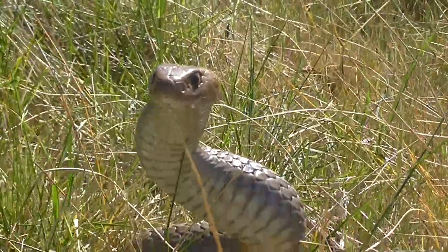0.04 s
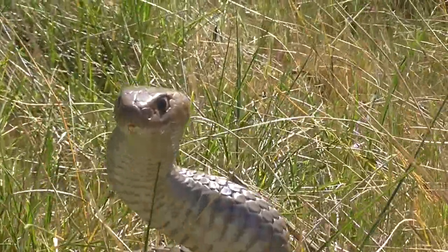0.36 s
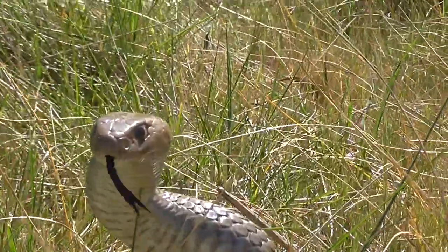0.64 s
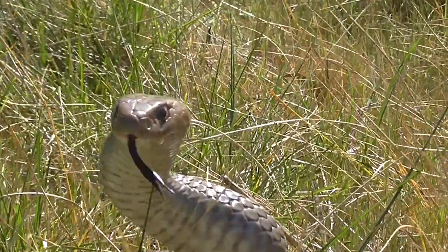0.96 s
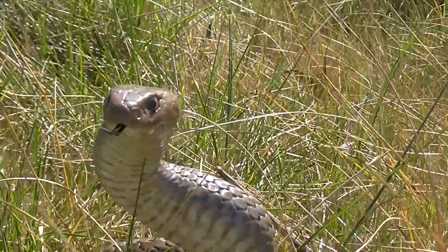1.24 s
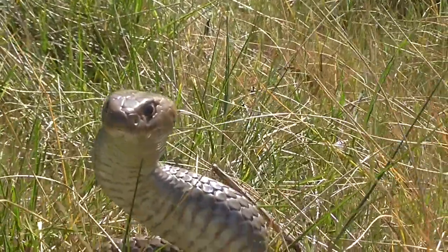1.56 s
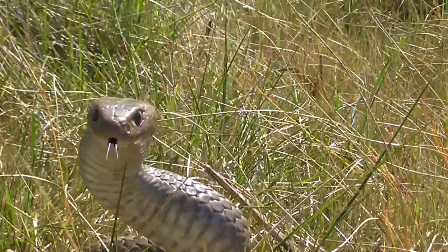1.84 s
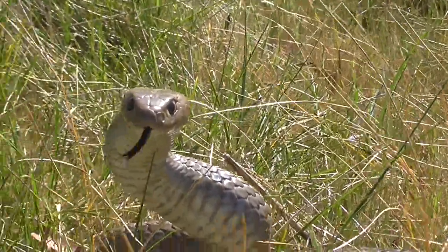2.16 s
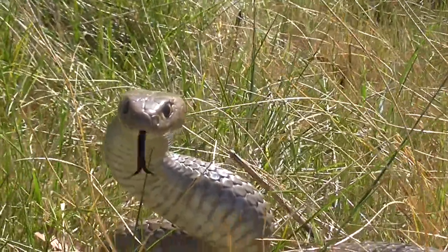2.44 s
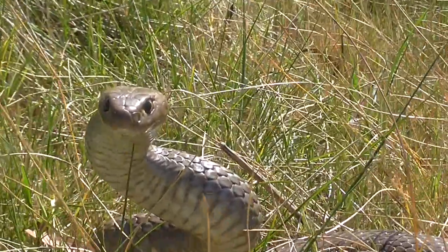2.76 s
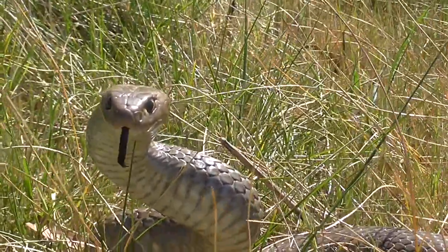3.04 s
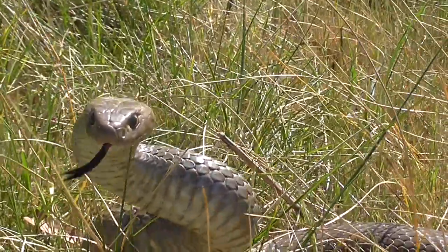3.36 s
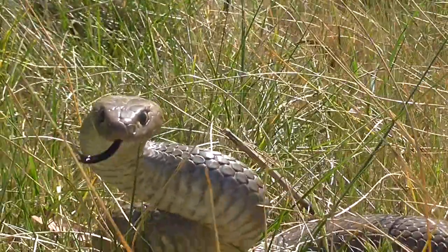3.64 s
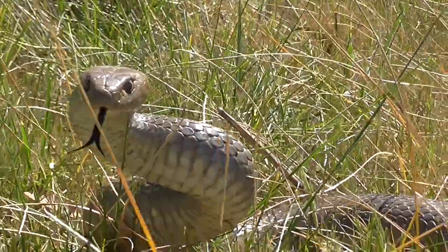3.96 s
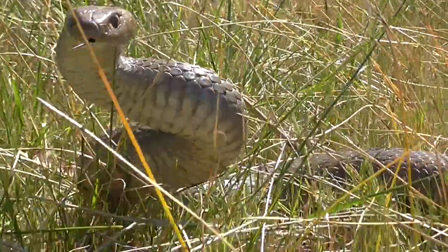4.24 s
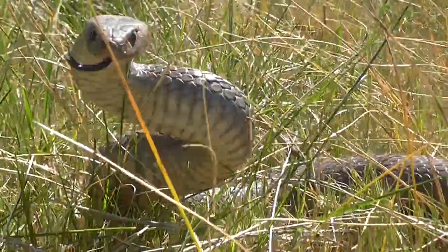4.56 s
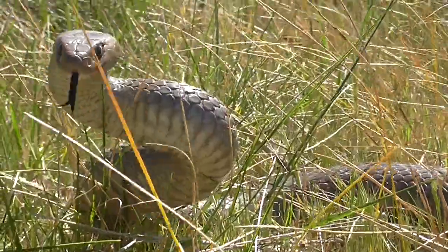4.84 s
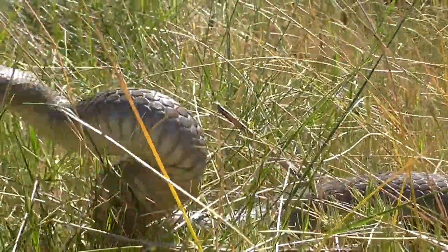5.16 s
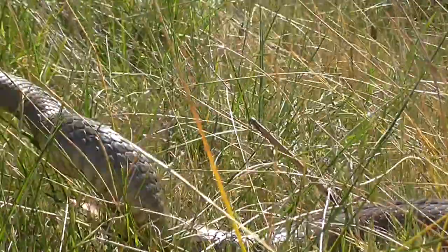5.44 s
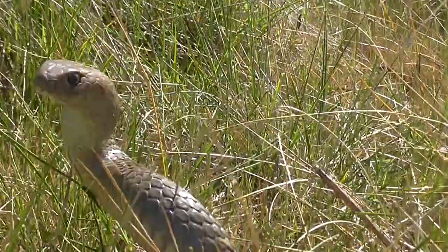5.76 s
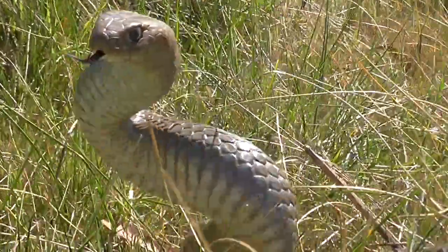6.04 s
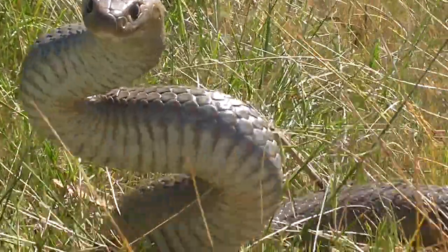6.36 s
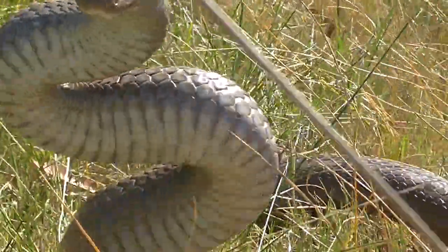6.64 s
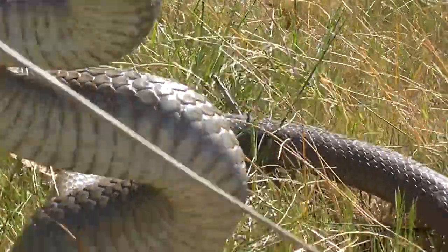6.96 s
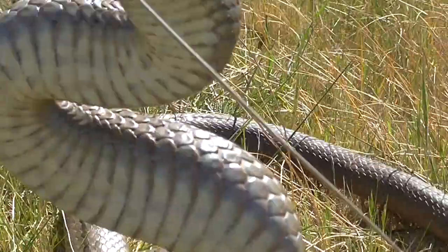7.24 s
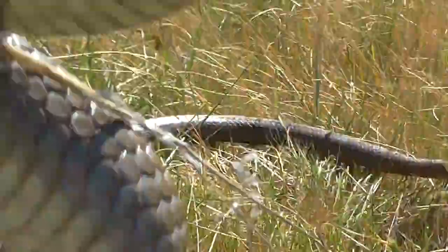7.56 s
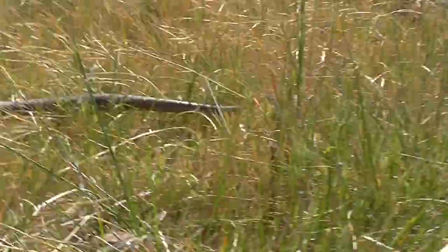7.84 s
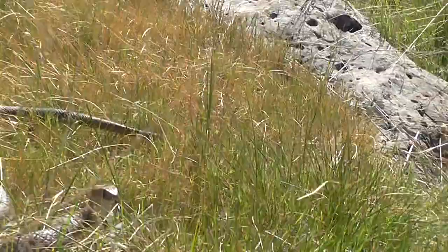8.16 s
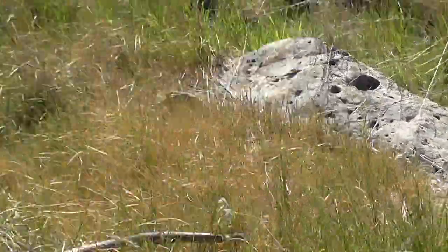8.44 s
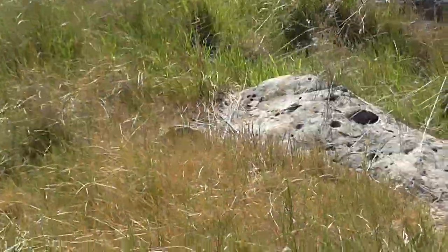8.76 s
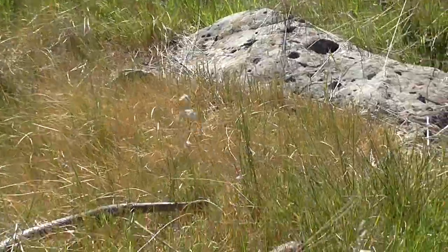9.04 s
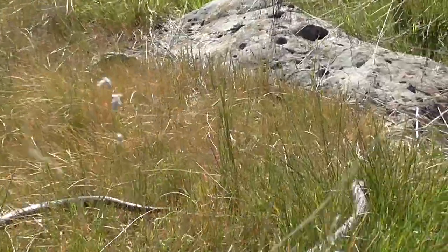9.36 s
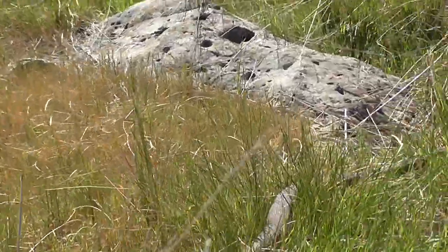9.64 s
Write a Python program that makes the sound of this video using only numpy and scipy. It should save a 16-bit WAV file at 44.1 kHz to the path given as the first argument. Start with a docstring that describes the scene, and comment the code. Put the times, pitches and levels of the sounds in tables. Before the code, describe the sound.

Low puffs of wind brush a hand-held microphone outdoors, with faint far-off bird whistles and a few tiny grass crackles. Then a snake slides through the dry grass nearby in short rustling surges, with sharp stalk snaps and stems tapping the camera. The wind builds to hard, thumping buffets over the rustle, and the sound narrows from stereo to mono.

```python
"""A snake slides through dry grass, close to a hand-held camera in a breezy field.
Its body rubs the blades into a crackling hiss, single stalks snap, and some stems knock on the camera.
Gusts buffet the microphone with rumble and thumps, harder towards the end, as the image narrows to mono.
Behind it all sits a bed of open air with faint, far-off birds."""
import sys
import numpy as np
from scipy import signal
from scipy.fft import rfft, irfft, next_fast_len
from scipy.io import wavfile
from scipy.ndimage import uniform_filter1d

SR = 44100
rng = np.random.default_rng(int(sys.argv[2]) if len(sys.argv) > 2 else 0)


def digitize_waveform(pressure):
    """Quantize a signal to 16-bit integers and store it at the path in sys.argv[1].

    Rows of a 2-D input are taken as channels; values are limited to [-1, 1].
    """
    field = np.atleast_2d(pressure).T
    bounded = np.clip(field, -1, 1)
    quanta = np.round(bounded * 32767).astype(np.int16)
    wavfile.write(sys.argv[1], SR, quanta)


N = 436149
T = np.arange(N) / SR

# EQ curves that voice each noise layer: (frequency [Hz], gain [dB])
AIR_EQ = [(80, -5), (200, 0), (300, -1.5), (450, -5.5), (700, -9.5), (1000, -15.5), (1450, -17.5),
          (1900, -15.5), (2700, -22.5), (4700, -21), (7000, -35), (11000, -40), (16000, -40)]
BREEZE_EQ = [(20, -42), (35, -33), (55, -3), (92, 0.5), (130, -1), (220, -12), (450, -56.5), (900, -58)]
GUST_EQ = [(20, -27), (45, -18), (90, 0.5), (150, 4), (220, -2), (320, -9.5), (450, -17.5), (650, -26),
           (1000, -37), (2000, -103)]
EDDY_EQ = [(60, -16.5), (130, -3.5), (260, 8), (480, -2.5), (850, -10.5), (1400, -17.5), (2000, -26.5),
           (2800, -42), (4000, -73)]
CRACK_EQ = [(800, -2), (2700, -11.5), (4200, 1), (6500, 5.5), (9000, 2.5), (12500, -2), (16000, -8)]
GRASS_EQ = [(400, -3), (900, 1.5), (1900, -1.5), (2900, -9.5), (3900, -2.5), (5200, 2.5), (7500, 2),
            (9500, -2), (13000, -6.5), (16000, -16)]
# far-off bird calls:
# (start [s], end [s], first pitch [Hz], middle pitch [Hz], last pitch [Hz], waver width [Hz], level [dB])
BIRD_CALLS = [(0, 0.598, 2260, 2210, 2060, 430, -62.5), (0.147, .23, 3000, 3250, 3500, 200, -64),
              (0.444, .56, 3200, 3780, 4700, 300, -59), (0.786, 0.866, 2900, 3220, 3650, 110, -65),
              (.7, 1.296, 1750, 1920, 2080, 380, -63), (1.145, 1.702, 2154, 2283, 2280, 516, -61.5),
              (1.298, 1.798, 4400, 4500, 4250, 900, -63), (1.52, 1.886, 2080, 1846, 1950, 483, -59.5),
              (8.163, 8.4, 4650, 4680, 4660, 40, -65), (8.483, 8.67, 4720, 4540, 4620, 70, -59),
              (8.67, 8.856, 4520, 4580, 4545, 50, -62)]
# airflow on the microphone between gusts: (time [s], flow level [dB])
BREEZE_FLOW = [(0, -47.5), (.9, -61.5), (1.45, -38.5), (1.78, -63), (2.0, -42), (2.35, -57), (2.9, -44),
               (3.3, -48), (3.9, -45), (4.6, -49.5), (4.95, -45.5), (5.68, -51.5), (5.85, -31.5),
               (6.9, -36.5), (7.8, -33.5), (8.3, -23), (8.8, -28), (9.0, -21.5), (9.89, -21)]
# gusts on top of the breeze: (start [s], length [s], flow level [dB], fine eddies against the flow [dB])
GUSTS = [(0.289, .035, -36.5, -30), (0.361, 0.022, -34.5, -32), (1.164, 0.037, -24, -17),
         (1.3, 0.047, -25, -40), (1.582, 0.052, -39, -33), (1.88, 0.052, -39, -30), (2.087, 0.07, -31, -35),
         (2.523, 0.027, -37, -19), (2.666, 0.029, -35.5, -30), (2.744, 0.071, -31, -25),
         (3.18, 0.035, -34.5, -36), (3.561, 0.026, -27.5, -22), (3.647, 0.041, -33, -36),
         (3.728, 0.082, -29.5, -39), (3.836, .17, -31, -43), (4.74, 0.042, -26.5, -13.5),
         (4.976, 0.25, -29, -24), (5.196, .12, -17, -16.5), (5.32, 0.058, -32, -20),
         (5.742, 0.19, -22, -20), (5.996, 0.024, -24, -27), (6.056, 0.025, -24, -15.5),
         (6.211, 0.064, -15, -8.5), (6.336, 0.046, -15.5, -23.5), (6.604, 0.081, -20.5, -29),
         (6.762, 0.023, -18, -33), (6.933, 0.07, -28, -25), (7.036, 0.096, -17, -22),
         (7.368, 0.036, -25.5, -19), (7.529, 0.17, -26.5, -21), (7.923, 0.29, -27.5, -9),
         (8.142, 0.11, -10, -8), (8.262, 0.13, -20.5, -8.5), (8.444, 0.027, -25, -8),
         (8.513, 0.062, -16, -8.5), (8.574, 0.11, -14.5, -8), (8.711, 0.022, -25, -18),
         (8.92, 0.19, -22.5, -15.5), (9.302, 0.11, -15.5, -20.5), (9.44, 0.047, -18.5, -12),
         (9.496, 0.036, -18, -4), (9.773, 0.046, -18, -16)]
# single eddies thumping the microphone: (time [s], relative peak [dB], pitch [Hz])
BUFFETS = [(1.335, -7, 155), (3.587, -15, 189), (3.736, -10, 149), (4.784, -5.5, 141), (5.843, -9, 163),
           (5.884, -6, 153), (6.222, -6, 158), (6.366, 2, 211), (6.779, -11.5, 115), (7.151, -3.5, 150),
           (7.544, -3, 173), (8.394, -1.5, 181), (8.532, 0.5, 135), (8.635, 2, 178), (8.752, -5.5, 124),
           (8.948, -2, 251), (8.988, -2, 265), (9.466, -7, 334), (9.557, -2, 305), (9.611, 3.5, 457),
           (9.803, 0, 168)]
# resonances of the camera housing: (frequency [Hz], relative level [dB], t60 [s])
HOUSING_MODES = [(321, -6, 0.07), (489, 2, 0.024), (706, -7, 0.066), (956, -6.5, 0.023), (1160, -36, 0.025),
                 (1950, -13.5, 0.022)]
# stems hitting the camera:
# (time [s], body peak [dB], stem pitch [Hz], stem trim [dB], crack trim [dB], left minus right [dB])
KNOCKS = [(3.759, -16.5, 690, 13, -17, -6), (4.304, -20.5, 716, 17, -0.5, 3), (4.456, -9, 1110, 1, -5, -3),
          (4.461, -12, 570, 6, -10, 4), (4.484, -6.5, 1050, 3.5, -3, 0), (5.293, -9.5, 1940, 2.5, -13, -2),
          (5.371, -7, 423, 10.5, -7.5, -7), (5.416, -12.5, 557, 5, -2.5, -5),
          (5.726, -23.5, 1470, 17, -1.5, 10), (6.994, -16, 850, 2, -10, -12), (7.402, -19.5, 840, 0, -6, 6),
          (7.829, -17.5, 606, 12, -21, 0), (7.863, -5.5, 890, -9, -7, -9),
          (7.868, -13.5, 396, -13, -6.5, 6), (7.922, -17.5, 870, -1, -6, 3), (9.557, -5, 640, 5, -23, 3),
          (9.612, -8.5, 497, 8, -42, -2)]
# dry stalks breaking: (time [s], relative peak [dB], ring [Hz], left minus right [dB], top shelf [dB])
SNAPS = [(1.847, -26, 6000, 4, -8), (1.919, -32, 5090, 0, 0), (1.946, -22.5, 7770, 2.0, 0),
         (2.2039, -26.5, 6030, -0.5, -1), (2.511, -22.5, 6050, 2, -8), (2.7623, -15, 6700, 4, 10),
         (3.2168, -15.5, 6670, 8, -1), (4.0822, -13, 7900, 8, 3), (4.3636, -3, 7000, -2, 7),
         (4.4347, -10, 5900, -1, -3), (5.5735, -15, 6350, 4, -6), (5.9117, -8, 5300, 7, -4),
         (6.0934, -12, 4940, 10, 5), (6.1727, -17, 7400, -5, -4), (6.1934, -12.5, 5600, 0.0, -2),
         (6.306, -10.5, 12260, 3, 6), (6.3124, -12.5, 12000, 0.5, 3), (6.4966, -21, 5850, -2, -1),
         (6.8877, -11.5, 5360, -2, -5), (6.9736, -11, 5830, -8, 2), (7.1352, -10, 9700, 5, 9),
         (7.3995, -10, 6840, -3, 6), (7.7338, -8, 6840, 3, 11), (7.801, -7.5, 9000, 0, 10),
         (9.4763, -8, 5800, -14, 6), (9.5748, -13, 6260, -4, 3)]
# the continuous grass rustle, which dips during the heaviest gusts: (time [s], level [dB], sparkle [dB])
BASE_RUSTLE = [(0, -53.5, -23), (.48, -51.5, -12), (.65, -62, -25), (1.15, -64.5, -13), (1.8, -57, -14),
               (2.4, -61, -10), (3.25, -69, -6), (3.6, -57.5, -9), (4.95, -55.5, -12), (5.6, -44.5, -10),
               (6.05, -53.5, -8), (6.9, -41.5, -8.5), (7.6, -43.5, -4), (8.08, -39, -19), (8.24, -51, -16),
               (8.75, -56.5, -23), (9.38, -40.5, -8), (9.89, -46, -8)]
# pushes of the snake's body against the grass:
# (start [s], length [s], attack [s], level [dB], sparkle [dB], left minus right [dB])
PUSHES = [(2.102, 0.073, 0.033, -53.5, -12, 0), (2.49, 0.18, 0.018, -53, -11, 5),
          (4.058, 0.11, .015, -47.5, -9, 0), (4.189, 0.071, 0.026, -43.5, -12, 5),
          (4.265, 0.22, 0.092, -35, -6, 6), (4.345, 0.014, 0.017, -41, 11, 0),
          (4.518, 0.047, .02, -37.5, -7, 7), (4.642, 0.13, 0.026, -42.5, -11, 11),
          (5.277, 0.14, 0.018, -36, -10, 7), (5.46, 0.097, .03, -41.5, -5, 1),
          (5.664, 0.15, 0.02, -42.5, -22, 11), (7.703, 0.13, 0.034, -34.5, -1, -3),
          (7.932, 0.037, 0.045, -32, -4, 4), (8.276, 0.26, 0.11, -42.5, -13, 0),
          (8.85, 0.19, .12, -40.5, -13, 0), (8.979, 0.041, .04, -36.5, -17, -10)]
# side-channel EQ, widest in the bass and the top: (frequency [Hz], gain [dB])
SIDE_EQ = [(60, 4), (150, 2), (380, -3), (700, -0.5), (1300, -0.5), (2400, -9), (4400, -4.5), (8000, 6.5),
           (15000, 17)]
# stereo width automation: (time [s], side gain [dB])
STEREO_WIDTH = [(0, -2.5), (4.4, -5.5), (5.3, -8), (6.1, -13.5), (6.6, -28.5), (7.4, -24.5), (8.1, -32),
                (8.4, -51), (8.8, -82)]


def undb(db):
    """Decibels to gain."""
    return 10 ** (np.asarray(db) / 20)


def unit(x):
    """Scale to rms 1."""
    return x / np.sqrt(np.mean(x ** 2))


def peak(x, db):
    """Scale to a peak level."""
    return x * undb(db) / np.abs(x).max()


def noise_pair(length=N):
    """Two unrelated white noises."""
    return rng.standard_normal((2, length))


def automation(table):
    """One lane per column, with straight ramps between the time points."""
    times, *columns = np.transpose(table)
    return [np.interp(T, times, column) for column in columns]


def eq(x, points):
    """Minimum-phase EQ through (frequency [Hz], gain [dB]) points, built from the cepstrum."""
    size = next_fast_len(x.shape[-1] // 2 + 256) * 2
    hz, db = np.transpose(points)
    bin_hz = np.maximum(np.arange(size // 2 + 1) * SR / size, 1)
    gain = undb(np.interp(np.log(bin_hz), np.log(hz), db))
    cepstrum = irfft(np.log(gain))
    cepstrum[1:size // 2] *= 2
    cepstrum[size // 2 + 1:] = 0
    return irfft(rfft(x, size) * np.exp(rfft(cepstrum)))[..., :x.shape[-1]]


def wobble(rate_hz):
    """Random LFO: slewed sample-and-hold at rms 1."""
    hold = max(int(SR / rate_hz), 2)
    steps = np.repeat(rng.standard_normal(N // hold + 1), hold)
    return unit(uniform_filter1d(steps, hold)[:N])


def spread(mid_side, side_db):
    """Left and right from mid and side."""
    return mid_side[0] + undb(side_db) * mid_side[1] * np.array([[1], [-1]])


def pan(db):
    """Left and right gains for a level difference, at constant power."""
    gains = undb(np.array([[.5], [-.5]]) * db)
    return gains / np.sqrt(np.mean(gains ** 2, axis=0))


def add(out, start_s, sound):
    """Mix a short sound in at its cue."""
    i = max(int(start_s * SR), 0)
    out[:, i:i + sound.shape[-1]] += sound[..., :N - i]


def decay(t, t60):
    """Exponential decay, 60 dB down after t60 seconds."""
    return np.exp(-np.log(1000) * t / t60)


def ring(t, hz, t60):
    """One struck mode."""
    return np.sin(2 * np.pi * hz * t) * decay(t, t60)


def surge(length_s, attack_s, sag_db_per_s, release_db_per_s):
    """Power envelope that rises, sags slowly while it lasts, then dies away."""
    t = T[:int((length_s + .5) * SR)]
    drop_db = sag_db_per_s * t + release_db_per_s * np.maximum(t - length_s, 0)
    return (np.minimum(t / attack_s, 1) * undb(-drop_db)) ** 2


def open_air(level_db=-49):
    """The bed: a soft, slowly swelling hush."""
    hush = unit(spread(eq(noise_pair(), AIR_EQ), side_db=-7))
    return hush * undb(level_db + 1.54 * wobble(1.05))


def birds():
    """Far-off whistles: each tone wavers, and distance smears it into a narrow band."""
    out = np.zeros((2, N))
    for start, end, first_hz, middle_hz, last_hz, width_hz, db in BIRD_CALLS:
        t = T[:int(np.clip(end - start, .03, 1) * SR)]
        contour_hz = np.interp(t, [0, t[-1] / 2, t[-1]], [first_hz, middle_hz, last_hz])
        lowpass = signal.butter(2, width_hz / 2, fs=SR, output="sos")
        waver = unit(signal.sosfilt(lowpass, rng.standard_normal(SR)))[-len(t):]
        hz = contour_hz + width_hz / 2 * waver
        tone = np.sin(2 * np.pi * np.cumsum(hz) / SR) * signal.windows.tukey(len(t), .5)
        # moving air makes far sounds fade in and out
        fading = undb(2.1 * wobble(37.7)[:len(t)])
        add(out, start, unit(tone * fading) * undb(db))
    return out


def airflow(waver_db=2.5, breeze_eddies_db=-16.5):
    """Gusts ride on a wavering breeze; gives the flow level in dB and the gain of its fine eddies."""
    breeze_db = automation(BREEZE_FLOW)[0] + waver_db * wobble(8.5)
    power = undb([breeze_db, breeze_db + breeze_eddies_db]) ** 2
    for start, length_s, db, eddies_db in GUSTS:
        envelope = surge(length_s, attack_s=0.02, sag_db_per_s=14, release_db_per_s=308)
        add(power, start, undb([[db], [db + eddies_db]]) ** 2 * envelope)
    return 10 * np.log10(power[0]), np.sqrt(power[1])


def turbulence(points, side_db, hold_s):
    """Pressure noise at the two microphone ports, levelled over spans of hold_s."""
    pressure = spread(eq(noise_pair(), points), side_db)
    power = uniform_filter1d(np.mean(pressure, axis=0) ** 2, int(hold_s * SR))
    return pressure / np.sqrt(power)


def wind():
    """A light breeze rumbles deep; faster flow sheds smaller, higher eddies that flutter."""
    flow_db, eddy_gain = airflow()
    flutter_db, sputter_db = 4.1 * wobble(70), 2.77 * wobble(130)
    breeze = turbulence(BREEZE_EQ, side_db=-4.5, hold_s=0.21) * undb(0.44 * flow_db - 25)
    gusts = turbulence(GUST_EQ, side_db=6.5, hold_s=0.0295) * undb(flow_db - 2.4 + flutter_db)
    eddies = turbulence(EDDY_EQ, side_db=-1, hold_s=0.019) * eddy_gain * undb(3.5 + sputter_db)
    # gusts only take over once the flow is fast
    gate = 1 / (1 + undb(-1.5 * (flow_db + 46.5)))
    # energy that breaks into fine eddies is taken from the large ones
    duck = 1 / np.sqrt(1 + (eddy_gain / undb(-24.5)) ** 2)
    return duck * (breeze + gate * gusts) + eddies


def buffets(trim_db=-8, pan_scatter_db=5.6):
    """An eddy thumps the ports: a swing of pressure a cycle or two long."""
    out, t = np.zeros((2, N)), T[:SR // 20]
    for start, db, hz in BUFFETS:
        cycles = hz * t
        thump = np.sin(2 * np.pi * cycles) * cycles ** 2 * np.exp(-cycles / 0.4)
        add(out, start, peak(thump, db + trim_db) * pan(pan_scatter_db * rng.standard_normal()))
    return out


def housing_ring(t):
    """The struck camera housing: its modes vary in level and tuning from hit to hit."""
    modes = np.zeros(len(t))
    for k, (hz, db, t60) in enumerate(HOUSING_MODES):
        jitter_db, detune = rng.normal(0, [2, 0.057])
        modes += (-1) ** k * undb(db + jitter_db) * ring(t, hz * (1 + detune), t60)
    return peak(modes, 0)


def stem_knocks(stem_t60=0.021, overtone_db=-11, crack_t60=0.019, thud_t60=0.056, thud_db=-1):
    """A stem whips the camera: stem and housing ring while the dry skin cracks."""
    out, t = np.zeros((2, N)), T[:SR // 10]
    thud_eq = [(100, -18.5), (350, 10), (900, -3), (2000, -18), (3000, -31), (6000, -71)]
    skin_eq = [(1000, -28), (2800, -5.5), (4000, 1.5), (5500, 6), (8000, 0.5), (15000, -13)]
    for start, db, hz, stem_db, crack_db, pan_db in KNOCKS:
        modes = housing_ring(t)
        noise = spread(noise_pair(len(t)), side_db=-6.5)
        thud = eq(noise * decay(t, thud_t60), thud_eq)
        housing = peak(modes + peak(thud, thud_db), 0)
        # a stem bends like a bar, with an overtone well above its lowest mode
        stem = ring(t, hz, stem_t60) + undb(overtone_db) * ring(t, 2.72 * hz, stem_t60 / 2)
        body = peak(housing + undb(stem_db - 8.5) * stem, db)
        crack = eq(noise * decay(t, crack_t60), skin_eq)
        add(out, start, body * pan(pan_db) + peak(crack, db + crack_db + 3))
    return out


def stalk_snaps(attack_s=0.00077, tear_t60=0.011, tail_db=-26, tail_t60=0.068, ring_db=-13, trim_db=-4):
    """A stalk breaks: a burst of tearing fibres, a short ring, a faint tail from the grass around."""
    out, t = np.zeros((2, N)), T[:SR // 20]
    tail = undb(tail_db) * decay(t, tail_t60)
    envelope = np.minimum(t / attack_s, 1) * (decay(t, tear_t60) + tail)
    for start, db, ring_hz, pan_db, shelf_db in SNAPS:
        tear = spread(noise_pair(len(t)), side_db=-8.5) * envelope
        shelved_eq = [(hz, gain_db + shelf_db * (hz > 10000)) for hz, gain_db in CRACK_EQ]
        snap = peak(eq(tear, shelved_eq), 0) + undb(ring_db) * ring(t, ring_hz, t60=0.024)
        add(out, start, peak(snap, db + trim_db) * pan(pan_db))
    return out


def rustle_lanes():
    """Level, sparkle and pan in dB: pushes ride on the base rustle; the louder sets tone and side."""
    base_db, base_sparkle_db = automation(BASE_RUSTLE)
    lanes = undb(base_db) ** 2 * np.array([np.ones(N), base_sparkle_db, np.zeros(N)])
    for start, length_s, attack_s, db, sparkle_db, pan_db in PUSHES:
        push = undb(db) ** 2 * surge(length_s, attack_s, sag_db_per_s=9, release_db_per_s=197)
        add(lanes, start, push * np.array([[1], [sparkle_db], [pan_db]]))
    power, weighted_sparkle, weighted_pan = lanes
    return 10 * np.log10(power), weighted_sparkle / power, weighted_pan / power


def blade_crackles(count=300, lift_db=10.5, scatter_db=3, t60=0.0048):
    """Brittle blades flick free one by one, each at its own pitch; their level follows the rustle."""
    out, t = np.zeros((2, N)), T[:SR // 60]
    rustle_db = rustle_lanes()[0]
    for when, pitch, chance, place in rng.random((count, 4)):
        i = int(when * (N - 1))
        burst = eq(rng.standard_normal(len(t)) * decay(t, t60), CRACK_EQ)
        tick = peak(burst, 0) + .5 * ring(t, 4200 * 2.6 ** pitch, t60)
        # many faint flicks, a few loud ones
        db = rustle_db[i] + lift_db - scatter_db * np.log(max(chance, .04))
        add(out, i / SR, peak(tick, db) * pan(8 * (place - .5)))
    return out


def snake_rustle(clicks_per_s=2400, scatter_db=5, click_db=-5, fibre_db=-4, scatter_t60=0.028):
    """Blades slip off the scales in clusters of tiny clicks, over the smooth hiss of rubbing fibres."""
    rustle_db, sparkle_db, pan_db = rustle_lanes()
    strength = undb(scatter_db * np.minimum(rng.exponential(size=N), 3.6))
    slips = strength * (rng.random(N) < clicks_per_s / SR)
    clicks = slips * rng.choice([-1, 1], N) * pan(8 * rng.standard_normal(N))
    # each click scatters among the neighbouring blades for a few ms
    scatter_power = signal.fftconvolve(slips ** 2, decay(T[:SR // 100], scatter_t60))[:N]
    scatter = np.sqrt(np.abs(scatter_power)) * spread(noise_pair(), side_db=-8.5)
    grains = unit(clicks) * undb(click_db) + unit(scatter)
    fibres = undb(fibre_db) * spread(noise_pair(), side_db=-22)
    blades = unit(eq(grains + fibres, GRASS_EQ))
    # fine, fast blades add sparkle at the top
    top = signal.sosfiltfilt(signal.butter(2, 9500, "high", fs=SR, output="sos"), blades)
    top_gain = undb(np.minimum(sparkle_db, -1) + 8.5)
    rustle = blades + top * (top_gain - 1)
    return rustle * undb(rustle_db + 0.35 + 1.97 * wobble(45)) * pan(pan_db)


def scene():
    """The mix at the microphone: wind, the snake in the grass, and the distant bed."""
    mic_wind = wind() + buffets()
    snake = snake_rustle() + blade_crackles() + stalk_snaps() + stem_knocks()
    return mic_wind + snake + open_air() + birds()


def record(dry):
    """The stereo image narrows towards the end; the camera rounds the loudest peaks and cuts the top."""
    width_db, = automation(STEREO_WIDTH)
    mid, side = (dry[0] + dry[1]) / 2, (dry[0] - dry[1]) / 2
    stereo = spread([mid, eq(side, SIDE_EQ)], width_db)
    soft_clipped = np.tanh(1.116 * stereo) / 1.066
    high_cut = signal.ellip(8, .2, 70, 16000, fs=SR, output="sos")
    return signal.sosfilt(high_cut, soft_clipped)


dry = scene()
out = record(dry)
digitize_waveform(out)
```